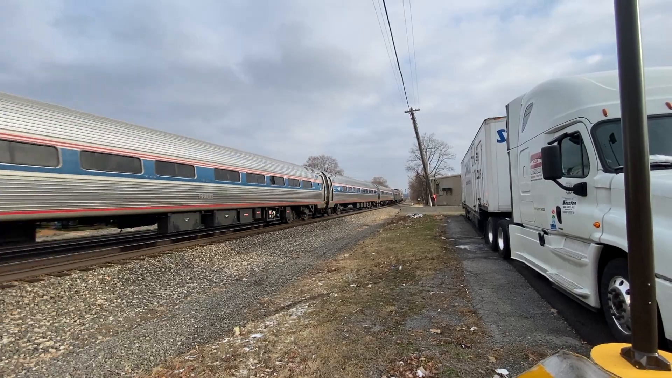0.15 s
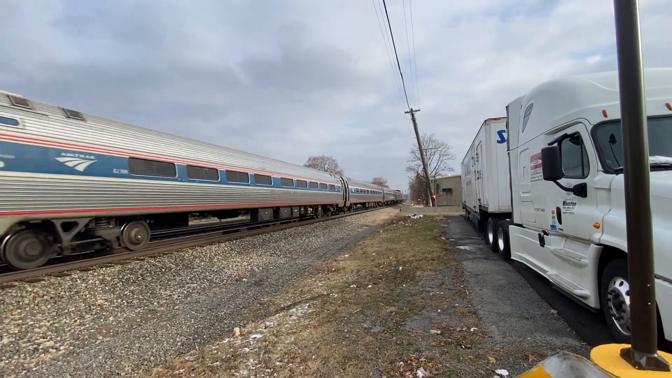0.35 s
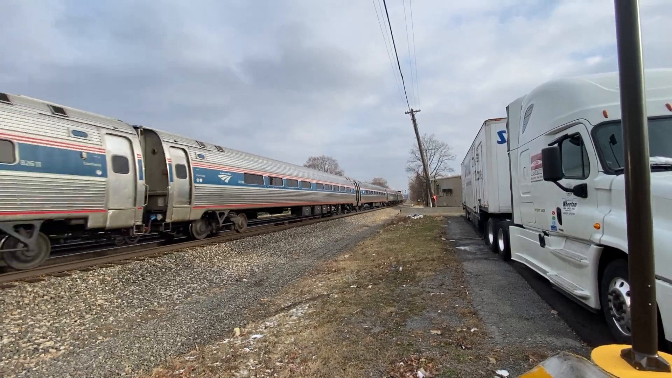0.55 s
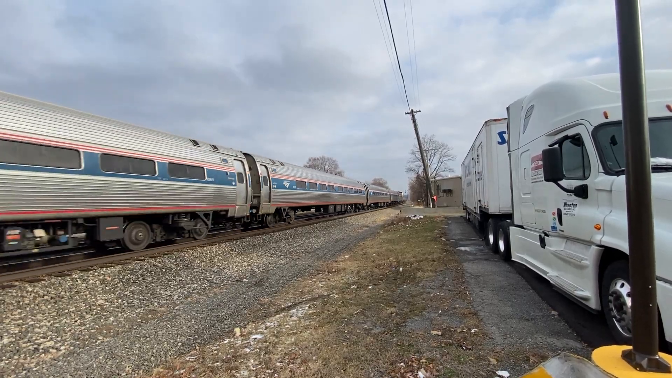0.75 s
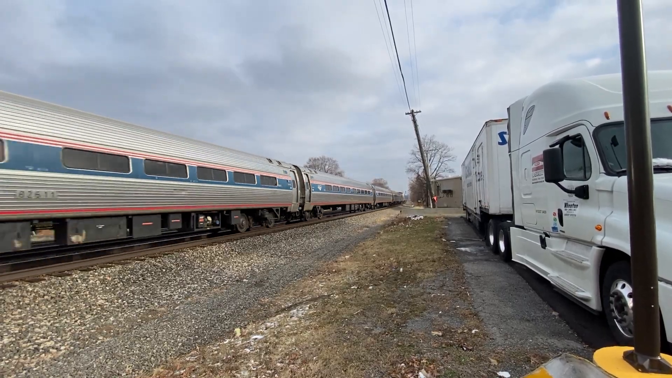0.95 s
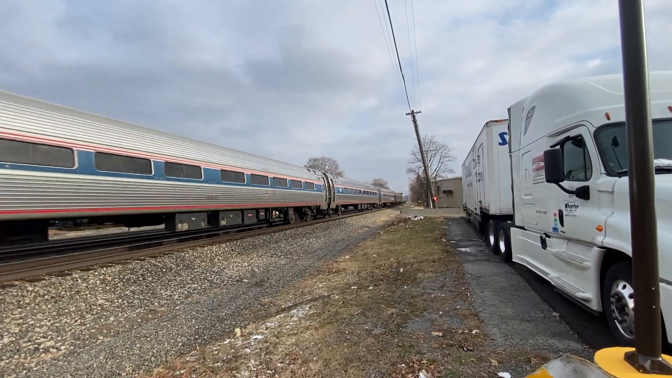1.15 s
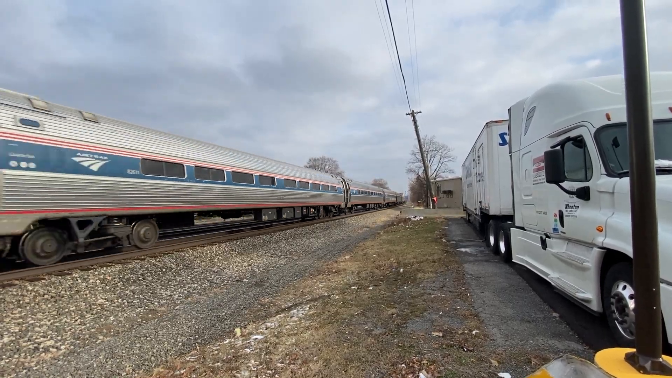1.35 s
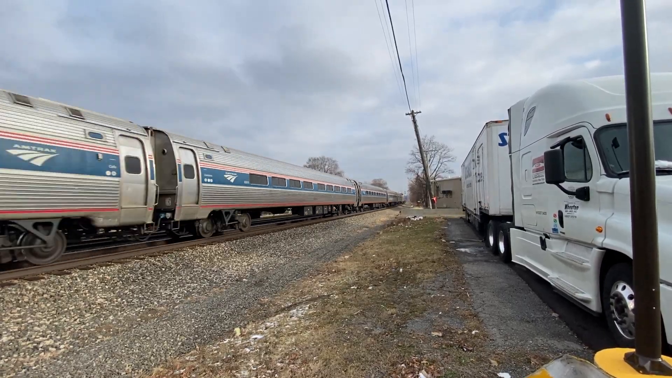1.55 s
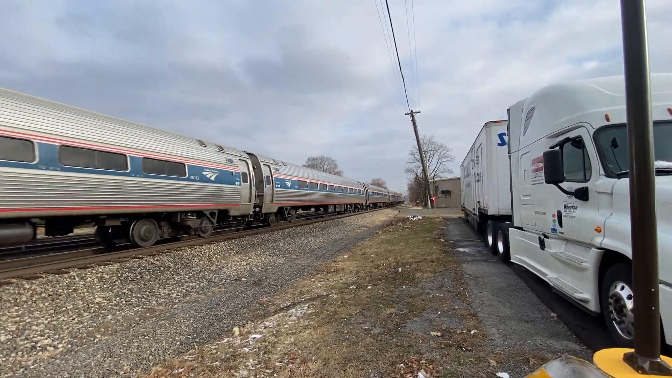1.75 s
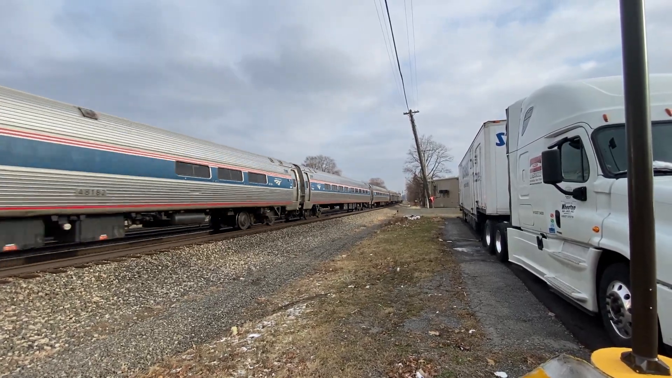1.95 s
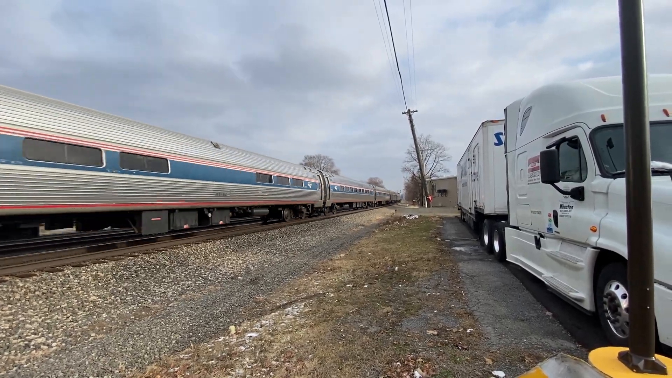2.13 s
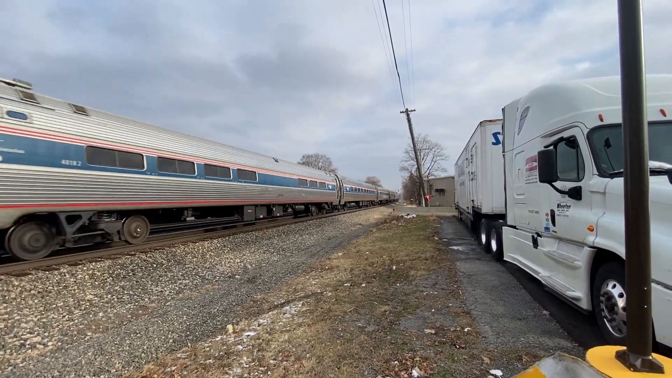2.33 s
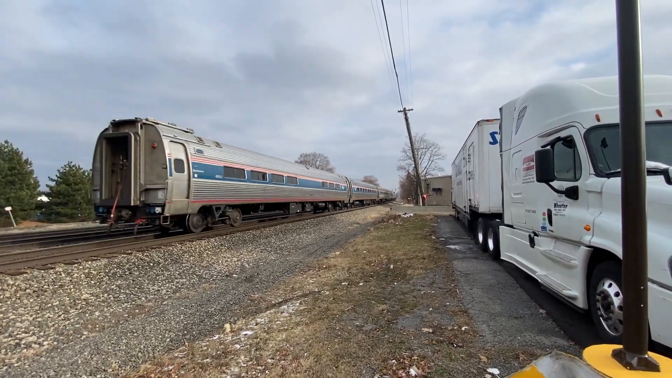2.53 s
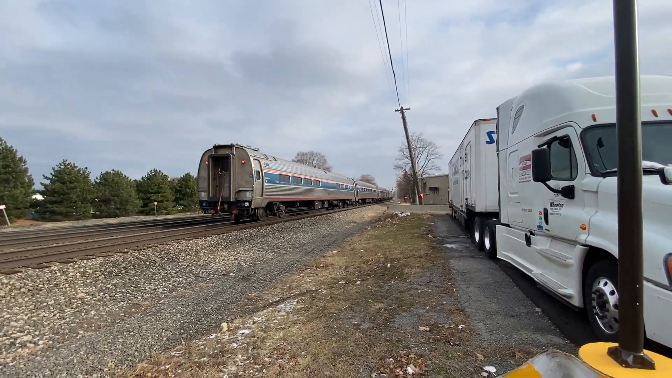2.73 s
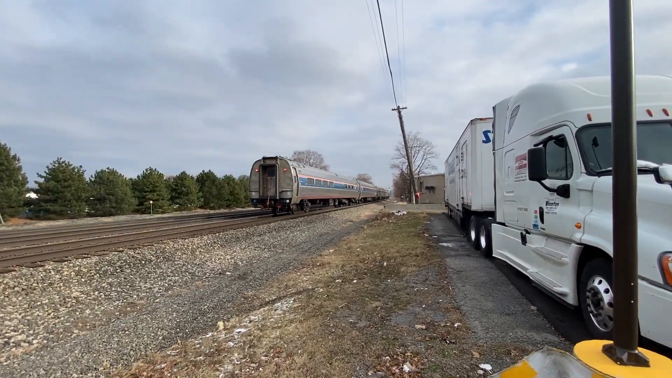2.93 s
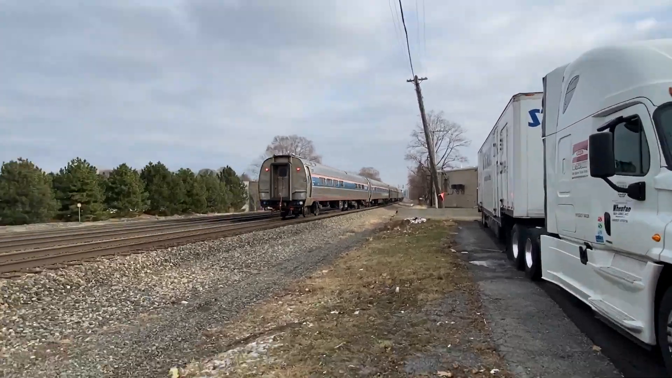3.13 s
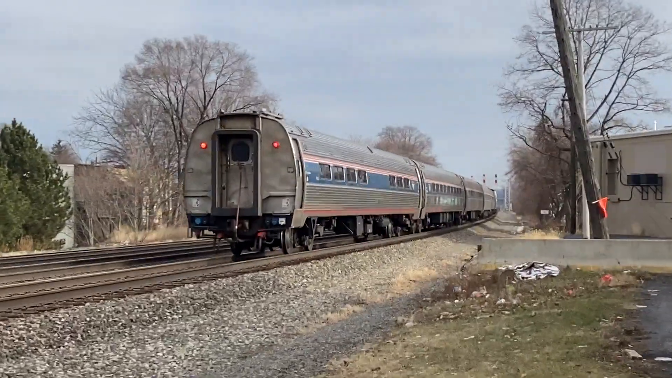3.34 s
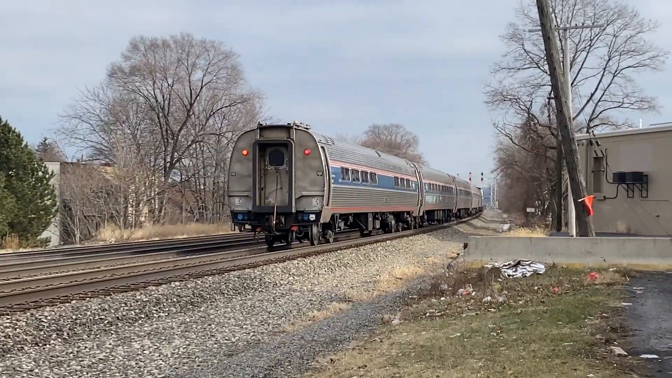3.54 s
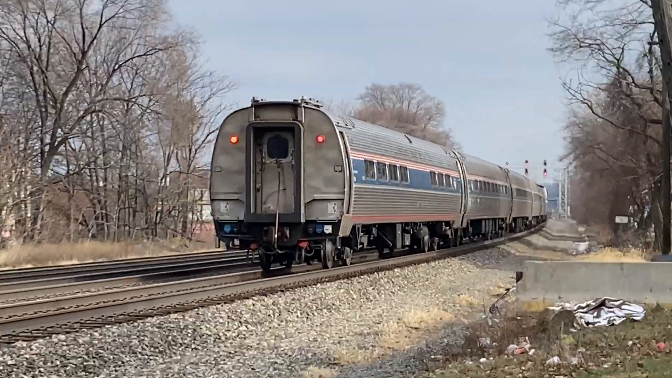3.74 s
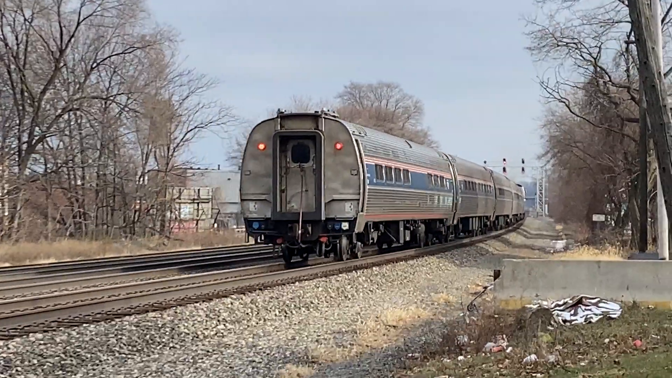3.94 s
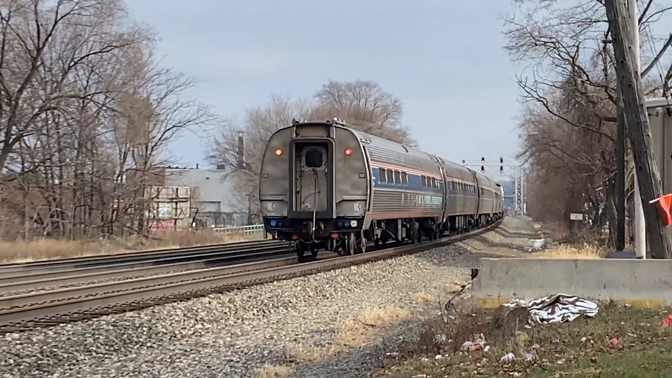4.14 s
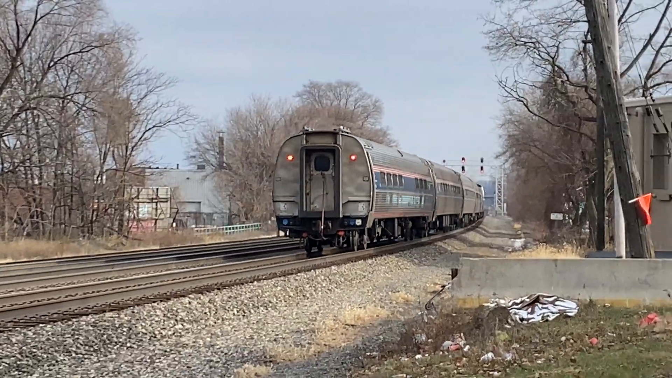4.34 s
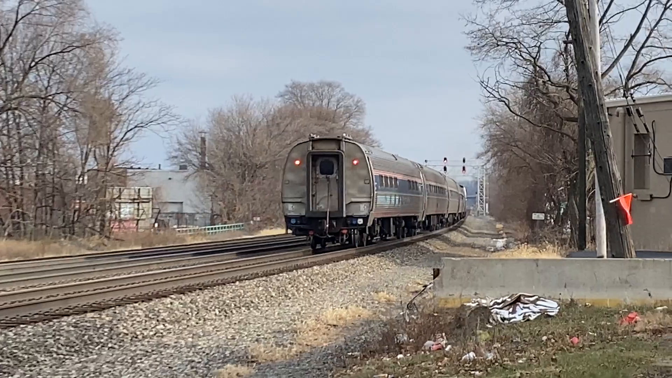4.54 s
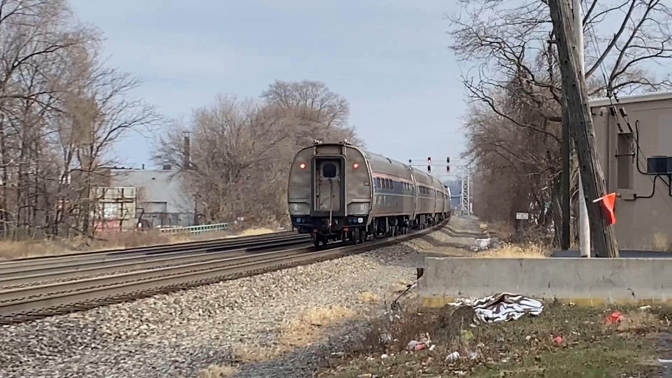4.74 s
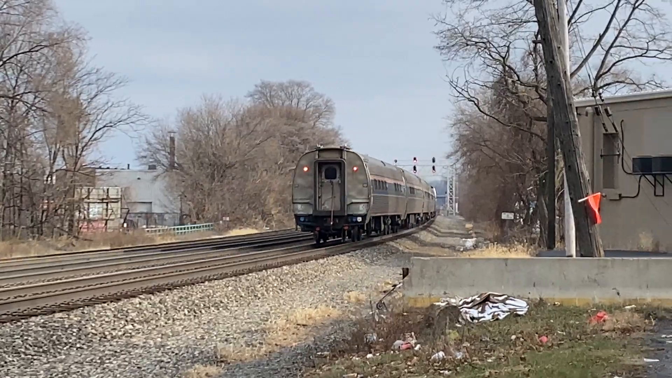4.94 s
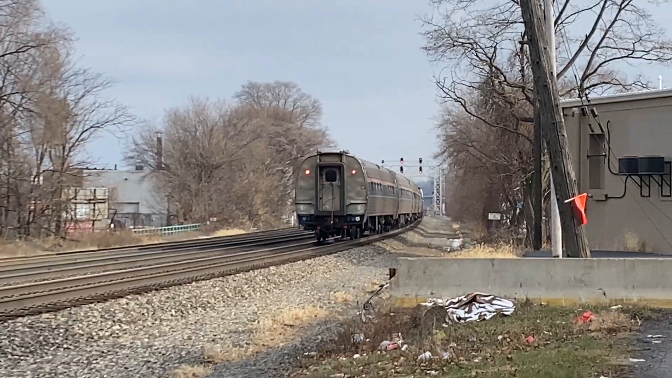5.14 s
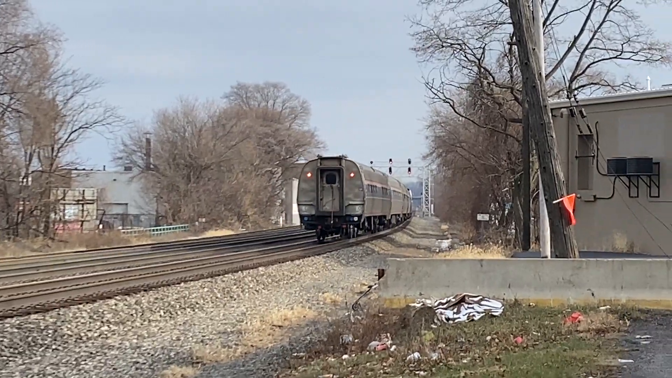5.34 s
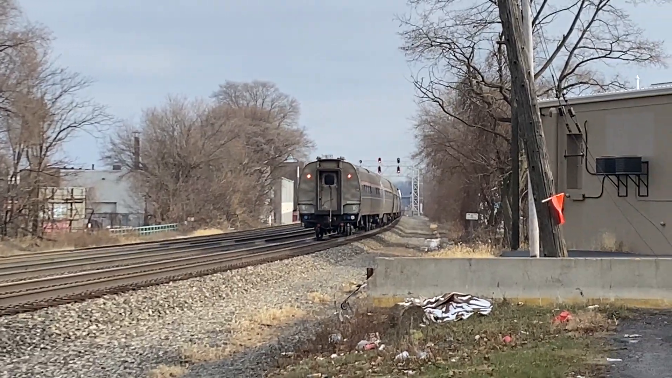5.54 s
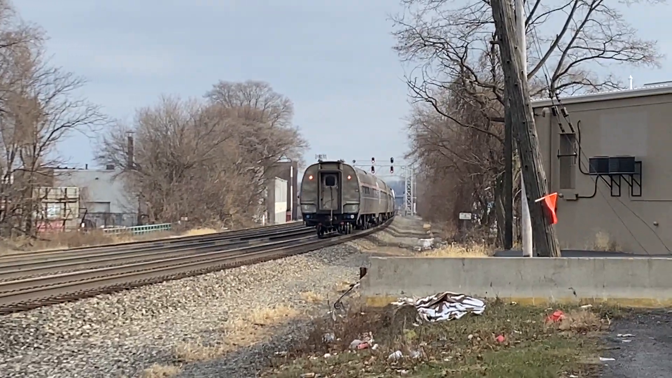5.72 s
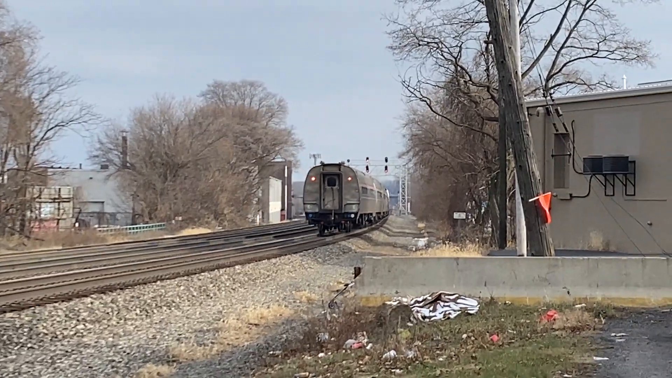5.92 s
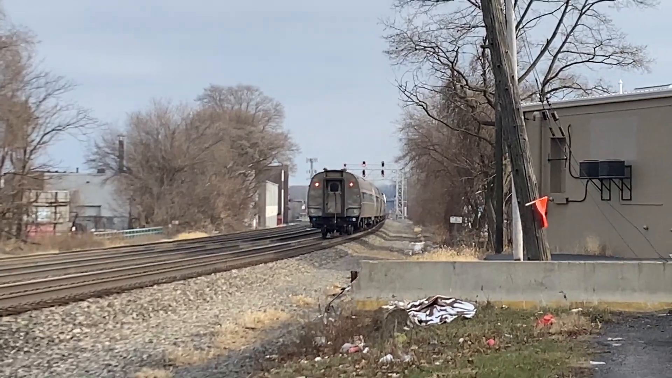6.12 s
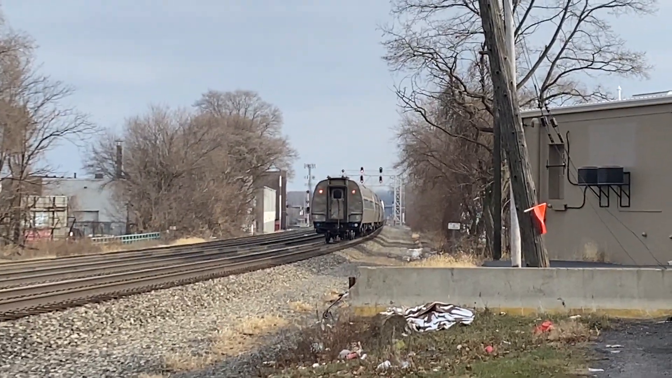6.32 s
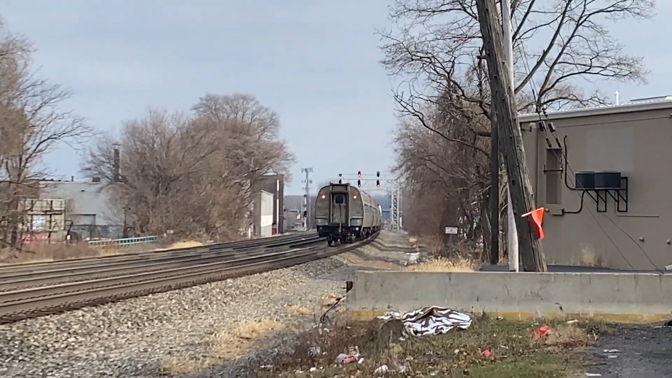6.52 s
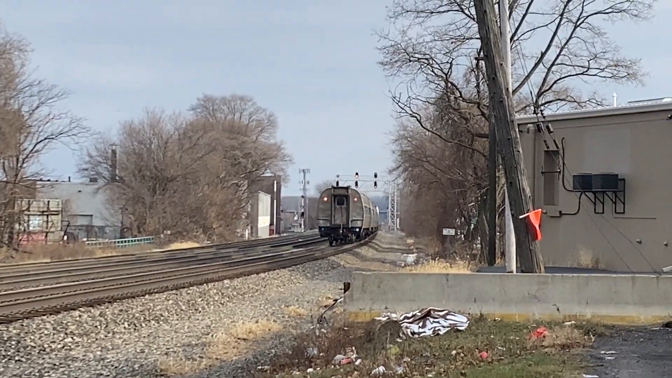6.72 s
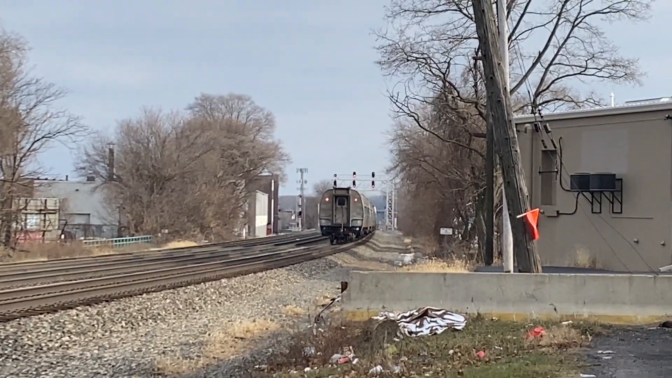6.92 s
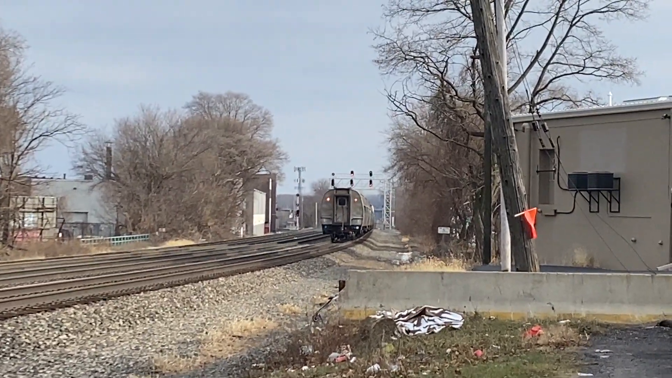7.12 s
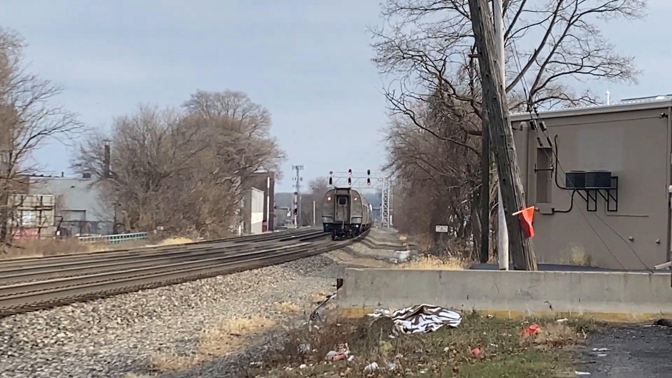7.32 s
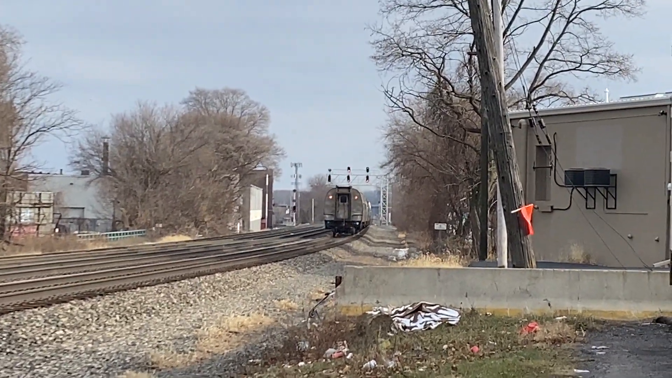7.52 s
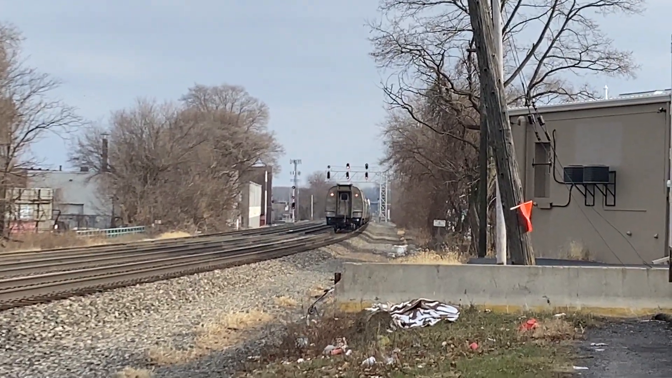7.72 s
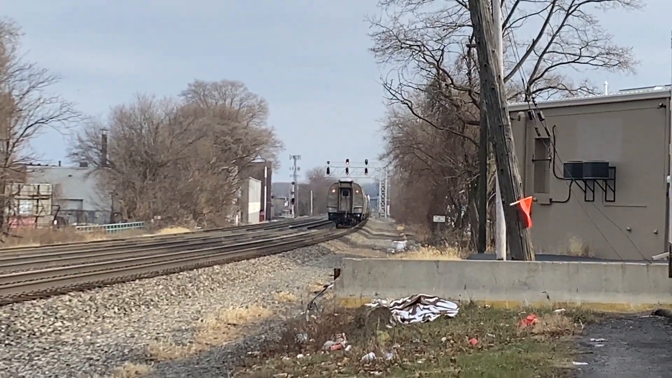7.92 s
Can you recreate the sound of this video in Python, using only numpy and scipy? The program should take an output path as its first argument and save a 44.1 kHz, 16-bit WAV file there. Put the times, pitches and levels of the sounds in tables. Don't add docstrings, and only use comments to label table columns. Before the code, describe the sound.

The last coaches of a passenger train clatter past close by with ringing, squealing wheels, then fade down the track beside an idling truck.

```python
import sys
import numpy as np
from scipy import signal
from scipy.fft import rfft, irfft
from scipy.io import wavfile
from scipy.ndimage import uniform_filter1d

SR = 44100
rng = np.random.default_rng(int(sys.argv[2]) if len(sys.argv) > 2 else 0)


def store_pcm(level_fs):
    pcm = np.round(np.clip(level_fs, -1, 1) * 32767).astype(np.int16)
    wavfile.write(sys.argv[1], SR, np.atleast_2d(pcm).T)


def volts_from_db(level):
    exponent = np.asarray(level, float) / 20
    return 10 ** exponent


N = 351477

SPEED_M_S, SIDE_M, TAIL_S = 25.7, 14.1, 2.07
ZOOM_S = 3.235
# middle in seconds, length in seconds, extra hiss in
# dB, extra air noise in dB.
NOISE_SWELLS = [(0.052, 0.75, 1.5, 3), (0.747, 0.69, -2, 0.5), (1.11, 0.38, 0.4, -0.5), (1.387, 0.6, 3, 4),
                (1.718, 0.057, -0.5, 4), (2.205, 0.16, 0.5, 3), (2.686, 0.28, -0.5, 4.5), (3.405, 1.3, 2, 1),
                (4.2, 0.74, -1.8, 1), (4.5, 2.8, 3, 11.5), (4.018, 0.3, 0, -3), (4.63, 0.22, 0, -4),
                (5.944, .3, 1, 4)]


def at_frequencies(points, hz):
    f, *columns = np.transpose(points)
    return [np.interp(np.log(hz + 1), np.log(f + 1), c) for c in columns]


def at_times(rows, t):
    s, *columns = np.transpose(rows)
    return [np.interp(t, s, c) for c in columns]


def evened(x):
    return x / np.sqrt(np.mean(x ** 2) + 1e-20)


def resonate(x, hz, width):
    turn = np.exp(2j * np.pi * np.cumsum(hz * np.ones(len(x))) / SR)
    r = np.exp(-np.pi * width / SR)
    return 2 * (turn * signal.lfilter([1 - r], [1, -r], x / turn)).real


def add(mix, s, sound):
    part = mix[round(s * SR):][:len(sound)]
    part += sound[:len(part)]


def bump(t, s, length):
    return np.exp(-4 * ((t - s) / length) ** 2)


def swells(rows, t):
    return sum(db * bump(t, s, length) for s, length, db in rows)


def bursts(rows, t):
    return 20 * np.log10(sum(volts_from_db(db) * bump(t, s, length) for s, length, db in rows) + 1e-6)


def sing(t, hz, level_db, width, fuzz):
    fuzzy = evened(resonate(resonate(rng.standard_normal(len(t)), hz, width), hz, width))
    steady = np.sqrt(2) * np.sin(2 * np.pi * np.cumsum(hz) / SR)
    share = np.clip(fuzz, 0, 1)
    tone = share * fuzzy + (1 - share) * steady
    return t[0], volts_from_db(level_db) * tone * signal.windows.tukey(len(t), .08)


def receding(t, near_db, spreading_share, town_db, fade_db_per_s):
    behind_m = SPEED_M_S * np.maximum(t - TAIL_S, 0)
    loss_db = 10 * np.log10(1 + (behind_m / SIDE_M) ** 2)
    engine_fade_db = fade_db_per_s * np.minimum(t, TAIL_S)
    zoom_gain_db = 0.5 * (t > ZOOM_S)
    train_db = near_db - spreading_share * loss_db - engine_fade_db + zoom_gain_db
    return 10 * np.log10(volts_from_db(train_db) ** 2 + volts_from_db(town_db) ** 2)


def hiss_level(t):
    base_db = receding(t, near_db=-33.5, spreading_share=1.58, town_db=-53.5, fade_db_per_s=0.72)
    return base_db + swells([(s, length, db) for s, length, db, _ in NOISE_SWELLS], t)


def truck():
    firing_hz, strong_firing_s = 24.25, 5.915
    # late firing as a share of the gap, level in dB.
    cylinders = [
        (0.029, 2.5),
        (0.05, -9),
        (-0.06, 0.5),
    ]
    # frequency in Hz, width in Hz, level in dB.
    exhaust = [(51.6, 3.9, 2), (76.9, 9.5, 9.5), (91, 38, -10.5), (122.6, 13.2, -1)]
    # multiple of the firing rate, level in dB.
    orders = [(2, -10), (3, -2), (10 / 3, -11), (11 / 3, -7), (4, -3), (5, -2), (16 / 3, -12)]
    # middle in seconds, length in seconds, extra level in dB.
    surges = [(0.158, 0.21, 4.5), (0.998, 0.98, 3.5), (1.545, 0.057, 8.5), (3.3, 0.2, 2.5), (5.9, 1, 0),
              (7.196, 0.14, 2.5)]
    # middle in seconds, length in seconds, level in dB.
    boom = [
        (2.1, .6, -50),
        (3.8, 0.52, -46),
        (6.0, 0.84, -33),
    ]
    # middle in seconds, length in seconds, level in dB.
    drum = [
        (4.4, 2.2, -46),
        (6.0, 1.5, -40.5),
        (7.5, 1.4, -41),
    ]

    firing = np.arange(-round(strong_firing_s * firing_hz), round(N / SR * firing_hz))
    late, db = np.transpose(cylinders)[:, firing % len(cylinders)]
    chance = rng.standard_normal((len(firing), 2))
    fire_s = strong_firing_s + (firing + late + 0.024 * chance[:, 0]) / firing_hz
    pushes = np.zeros(3 * N)
    pushes[(fire_s * SR).astype(int)] = volts_from_db(db + 0.6 * chance[:, 1])
    pushes = pushes[:N]
    pipe = sum(volts_from_db(db) * resonate(resonate(pushes, hz, width), hz, width * 0.88)
               for hz, width, db in exhaust)

    t = np.arange(N) / SR
    turns = (t - strong_firing_s) * firing_hz
    drone = sum(volts_from_db(db) * np.sin(2 * np.pi * k * turns) for k, db in orders)
    idle_db = -29 - 0.5 * t + swells(surges, t)
    panels = sum(volts_from_db(bursts(rows, t)) * np.sqrt(2) * np.sin(2 * np.pi * k * turns)
                 for rows, k in [(boom, 3), (drum, 2)])
    return panels + volts_from_db(idle_db - 2.0) * (0.91 * evened(pipe) + 0.84 * drone)


def grit():
    # start in seconds, peak level in dB.
    ticks = [(1.7683, -37.5), (2.0654, -42), (3.2594, -47), (3.5694, -52), (3.6996, -44), (3.7729, -37),
             (3.85, -45), (4.1844, -36.5), (4.4494, -46), (4.7494, -52), (4.8494, -48), (5.04, -44),
             (5.31, -51), (5.67, -52), (5.77, -44), (6.6872, -50), (4.392, -55), (4.969, -51), (5.52, -54),
             (5.906, -52), (6.236, -55), (7.848, -62)]
    out, t = np.zeros(N), np.arange(2600) / SR
    for s, db in ticks:
        noise = rng.standard_normal(len(t)) * np.sin(np.pi * t / t[-1])
        puff = resonate(resonate(noise, 12500, 4000), 12500, 4000)
        add(out, s, volts_from_db(db - 6.5) * puff / abs(puff).max())
    return out


def flange():
    # start in seconds, length in seconds, level in dB, first pitch in Hz, last pitch in Hz.
    strokes = [
        (1.15, 0.92, -36, 4800, 3070),
        (1.719, 0.23, -42.5, 4000, 3870),
        (1.748, 1, -42.5, 3300, 3500),
        (2.49, 0.16, -53, 3950, 3870),
        (2.717, 0.3, -47.5, 3920, 3730),
        (3.097, 0.65, -45.5, 3550, 3320),
        (3.6, 0.67, -53, 3900, 3400),
    ]
    scrape = np.zeros(N)
    for s, length, db, from_hz, to_hz in strokes:
        t = np.arange(s, s + length, 1 / SR)
        glide = np.exp(-(t - s) / (0.29 * length))
        level_db = bursts([(s + length / 2, length, db)], t)
        add(scrape, *sing(t, to_hz + (from_hz - to_hz) * glide, level_db, width=850, fuzz=1))
    part = scrape[:5 * SR]
    modes_hz = np.linspace(3050, 4600, 13) + 40 * rng.standard_normal(13)
    add(scrape, 0, 0.42 * sum(resonate(part, hz, 24) for hz in modes_hz))
    return scrape


def wheel_modes():
    # frequency in Hz, width in Hz, level in dB over the hiss.
    modes = [(1390, 50, -12), (1980, 45, -13), (2640, 90, -15), (3430, 50, -16), (3980, 26, -22)]
    out, hiss_db = np.zeros(N), hiss_level(np.arange(N) / SR)
    for hz, width, db in modes:
        flicker = np.interp(np.linspace(0, 99, N), np.arange(100), rng.standard_normal(100))
        out += volts_from_db(hiss_db + db + 2.0 * flicker) * evened(resonate(rng.standard_normal(N), hz, width))
    return out


def single_rings():
    # middle in seconds, length in seconds, frequency in Hz, level in dB.
    rings = [(.12, .1, 2084, -32), (.19, .09, 2700, -44), (.22, .09, 2010, -39), (.28, .09, 1495, -29),
             (.31, 0.11, 2720, -34), (.33, .1, 1970, -33.5), (.45, 0.1, 1420, -26), (.51, .13, 2670, -43),
             (.54, .12, 4940, -45), (.55, .08, 3600, -45), (.62, .06, 990, -22.5), (.63, .15, 1870, -33),
             (.79, .1, 1016, -31), (.8, .11, 2030, -41), (.93, .17, 3800, -54), (.93, .19, 1280, -32),
             (1.087, .11, 1990, -38), (1.06, .08, 990, -44), (1.17, .09, 1425, -41), (1.24, .11, 2780, -37),
             (1.24, .11, 1953, -32.5), (1.28, .08, 4530, -42), (1.34, .08, 3560, -34),
             (1.37, .08, 4630, -43), (1.41, .09, 1415, -31), (1.46, .2, 1430, -36), (1.48, .17, 2700, -46),
             (1.45, .08, 4340, -48), (1.51, .09, 4040, -37), (1.56, .11, 1930, -41), (1.56, .14, 3390, -41),
             (1.68, .09, 3400, -34), (1.74, .09, 4930, -45), (1.81, .08, 3820, -42), (1.8, .08, 4030, -48),
             (1.97, .13, 1330, -29), (2.01, .08, 3360, -31), (2.15, .2, 3420, -50),
             (2.22, 0.11, 1565, -34.5), (2.33, .12, 1534, -39), (2.576, .11, 4000, -55),
             (2.8, .12, 3870, -51), (2.82, .12, 3210, -39), (2.8, .12, 3350, -50), (2.86, .12, 4110, -50),
             (.5, .08, 987, -29), (3.143, .08, 3950, -50),
             (.09, 0.087, 6500, -43), (.23, 0.059, 2150, -32.5), (.24, 0.069, 2450, -39),
               (.3, .1, 3700, -48), (.4, 0.095, 4550, -54), (.45, .2, 3550, -53), (.72, 0.049, 960, -36),
               (.77, .05, 6150, -40), (.8, 0.066, 1000, -25.5), (.88, 0.05, 1010, -32),
               (.97, 0.11, 990, -28.5), (.93, .15, 3800, -46), (1.02, 0.16, 2010, -39),
               (1.27, 0.11, 4220, -39), (1.29, .1, 4470, -43), (1.38, .07, 4640, -41),
               (1.4, .07, 3740, -45), (1.45, 0.075, 4330, -45), (1.5, 0.14, 4050, -47),
               (1.52, .1, 3500, -36), (1.68, .05, 3320, -33), (1.8, .1, 4050, -36),
               (1.82, 0.052, 3850, -44), (1.85, 0.13, 4170, -48), (1.93, .06, 3480, -36),
               (1.95, 0.088, 4000, -41), (2.14, 0.11, 3440, -41), (2.38, .14, 3500, -54),
               (2.5, 0.19, 178, -40), (2.52, 0.11, 5020, -48), (2.53, 0.057, 3520, -37),
               (2.55, .08, 3800, -49), (2.575, .09, 3960, -39), (2.79, 0.074, 3830, -38),
               (2.8, 0.16, 3420, -38), (2.81, .1, 3950, -43), (2.58, .1, 3850, -43),
               (3.35, 0.083, 2620, -48), (3.4, 0.2, 3990, -45), (4.3, .25, 11500, -61),
               (4.78, .05, 11300, -60), (5.35, 0.11, 11000, -65)]
    out = np.zeros(N)
    for s, length, hz, db in rings:
        t = np.arange(max(s - length, 0), s + length, 1 / SR)
        level_db = bursts([(s, length, db - 2)], t)
        add(out, *sing(t, hz + 0 * t, level_db, width=min(100, hz / 12), fuzz=.62))
    return out


def singing_modes():
    # middle in seconds, length in seconds, level in dB.
    drag = [
        (1.7, 0.55, -43.5),
    ]
    rail_hum = [(2.15, .1, -38), (2.43, .32, -33.5), (2.7, .1, -36.5), (2.98, .28, -39), (3.17, .2, -45),
                (3.42, .25, -46), (3.7, .22, -43), (3.92, .28, -44.5), (4.15, .22, -42), (4.38, .28, -41),
                (4.6, .2, -49), (5.4, .45, -48)]
    wheel_song = [(2.12, .25, -44), (3.285, .075, -44), (3.365, .05, -40), (3.398, .04, -35),
                  (3.46, .05, -39.5), (3.55, .08, -45), (3.635, .11, -37), (3.74, .065, -42),
                  (3.81, .05, -50), (3.87, .09, -47), (3.94, .06, -51), (4.01, .05, -48), (4.07, .08, -43),
                  (4.15, .09, -48), (4.31, .08, -51), (4.45, .08, -50.5)]
    wheel_top = [
        (3.15, .18, -52),
        (3.275, .07, -50),
        (3.62, .35, -62),
        (4.15, .2, -65),
        (2.52, .08, -53),
    ]
    wheel_low = [
        (2.45, 0.31, -45),
        (3.3, 0.17, -49),
        (3.45, 0.29, -49.5),
    ]
    out = np.zeros(N)
    # table, pitch in Hz, rise in Hz per s, width in Hz, noise share
    for rows, hz, rise, width, fuzz in [(drag, 11740, 0, 120, .9), (rail_hum, 232, 2.81, 8, .1),
                                        (wheel_song, 3202, 7.5, 80, .24), (wheel_top, 4925, 0, 25, .15),
                                        (wheel_low, 2600, 0, 60, .8)]:
        start = min(s - length for s, length, _ in rows)
        end = max(s + length for s, length, _ in rows)
        t = np.arange(start, min(end, N / SR), 1 / SR)
        pitch = hz + rise * abs(t - 3.25)
        add(out, *sing(t, pitch, bursts(rows, t), width, fuzz))
    return out


def brake_whistles():
    # passing time in seconds, pitch in Hz, brief peak level at passing in dB, level on approach in
    # dB.
    whistles = [
        (1.059, 11730, -28.5, -42),
        (2.1, 11800, -28.5, -35),
    ]
    out = np.zeros(N)
    for s, hz, abreast_db, lead_db in whistles:
        t = np.arange(s - .52, s + .4, 1 / SR)
        ahead_m = SPEED_M_S * (t - s)
        pitch = hz * (1 - SPEED_M_S / 343 * ahead_m / np.hypot(ahead_m, SIDE_M))
        abreast = volts_from_db(abreast_db) ** 2 / (1 + ((t - s) / 0.045) ** 2) ** 1.23
        approach = (volts_from_db(lead_db) * bump(t, s - 0.27, 0.41)) ** 2
        add(out, *sing(t, pitch, 10 * np.log10(abreast + approach), width=210, fuzz=0.48))
    return out


def clatter():
    # start in seconds, peak level in dB, ring in Hz.
    flat_wheel = [(0.063, -22, 620), (0.082, -12, 610), (0.115, -14, 426), (0.178, -19, 674),
                  (0.2, -13, 522), (0.217, -8.5, 570), (0.232, -15, 685), (0.314, -6.5, 647),
                  (0.412, -7, 440), (0.438, -8.5, 430), (0.518, -11, 444), (0.573, -11, 590),
                  (0.625, -9.5, 600), (0.688, -13, 510), (0.734, -14, 710), (0.785, -22, 570),
                  (0.841, -10, 614), (0.866, -16, 470), (0.916, -13.5, 452), (0.955, -16.5, 580),
                  (0.99, -27, 646), (1.013, -14, 570), (1.062, -10.5, 607), (1.102, -17, 650),
                  (1.155, -12.5, 604), (1.196, -15.5, 570), (1.235, -24, 535), (1.26, -10, 513),
                  (1.32, -16.5, 520), (1.361, -16, 493), (1.4, -11.5, 460), (1.415, -16, 604),
                  (1.453, -16, 534), (1.513, -9.5, 436), (1.572, -9.5, 560), (1.615, -13.5, 774),
                  (1.674, -12, 550), (1.72, -15, 850), (1.737, -9, 600), (1.83, -14, 684),
                  (1.858, -12.5, 490), (1.897, -7.5, 520), (1.935, -11, 670), (1.99, -17, 600),
                  (2.045, -15, 720), (2.067, -14.5, 640), (2.106, -24, 436), (2.154, -17, 690),
                  (2.174, -15, 582), (2.237, -40, 673), (2.267, -29, 615), (2.371, -26, 560)]
    # start in seconds, peak level in dB, ring in Hz.
    joints = [
        (6.657, -31, 640),
        (6.85, -35, 800),
        (7.01, -35, 720),
        (7.222, -29, 750),
        (7.29, -34, 760),
        (7.38, -35, 740),
    ]
    # frequency in Hz, width in Hz, level in dB.
    tread = [(960, 150, -13), (1316, 160, -15), (2004, 180, -23)]
    echo_s, echo_db = .024, -13
    high_pass = signal.butter(2, 300, "high", fs=SR, output="sos")
    out, t = np.zeros(N), np.arange(2600) / SR
    for s, db, hz in flat_wheel + joints:
        noise = rng.standard_normal(len(t))
        knock = np.exp(-t / 0.00037) + 0.23 * noise * volts_from_db(-60 * t / 0.07)
        knock = knock * np.minimum(t / 0.0008, 1)
        blow = resonate(resonate(knock, hz, 210), hz * 1.1, 460)
        blow += sum(volts_from_db(ring_db) * resonate(resonate(knock, f, width), f, 400) for f, width, ring_db in tread)
        blow = signal.sosfilt(high_pass, blow)
        blow = volts_from_db(db - 1.1) * blow / abs(blow).max()
        add(out, s, blow)
        add(out, s + echo_s, volts_from_db(echo_db) * blow)
    return out


def rolling():
    # frequency in Hz, density in dB per Hz.
    roar_near = [(22, -72), (35, -25), (60, -8), (110, -8.5), (200, -4.5), (250, -4), (310, -16), (400, -5),
                 (600, -3.5), (850, -7), (1000, -9), (1150, -25.5), (1500, -35.5), (2500, -62)]
    roar_far = [(22, -41), (38, -21), (50, -14), (100, -5.5), (160, -8), (235, -17), (300, -13.5),
                (400, -21), (750, -17.5), (1150, -18), (1500, -6), (2500, -80)]
    hiss_near = [(900, -0.5), (1150, 0.5), (1400, 2), (1700, -6), (2000, -6.5), (2400, -6.5), (3500, -9),
                 (5000, -8.5), (8000, -11), (10000, -60)]
    hiss_far = [(900, -30.5), (1150, -6.5), (1400, -3), (1700, 0.5), (2000, -0.5), (2400, -8), (3400, -3.5),
                (4600, -18.5), (7000, -32), (9000, -48)]
    air_near = [(7000, -13), (9000, -4), (11000, -3), (12000, -2.5), (13000, -7.5), (14000, -8),
                (15000, -8.5), (15750, -23), (15950, -59)]
    air_far = [(7000, -31), (9000, -29), (11000, -12.5), (12000, -13.5), (13000, 3), (14000, 7.5),
               (15000, 4), (15750, -10), (15950, -58)]
    # time in seconds, share from 0 near to 1 far.
    distance = [(0, 0.19), (1, 0.17), (2.2, 0.12), (2.8, 0.24), (3.3, 0.108), (4.2, 0.39), (5, 0.66),
                (6, 0.73), (7.97, 1)]
    # middle in seconds, length in seconds, extra
    # level in dB.
    top_swells = [
        (1.02, .35, 8),
        (1.5, .3, -3),
        (1.85, .5, -6),
        (2.5, .7, -5),
        (3.45, .9, 7),
        (4.35, .6, 4),
    ]

    frames, hz = N // 256 + 5, np.fft.rfftfreq(1024, 1 / SR)
    t = np.arange(frames) * 256 / SR
    far = np.clip(at_times(distance, t)[0], 0, 1)
    roar_db = receding(t, near_db=-27, spreading_share=1.37, town_db=-42.5, fade_db_per_s=1.47)
    air_db = receding(t, near_db=-54, spreading_share=2.5, town_db=-78, fade_db_per_s=-1.2)
    air_db = air_db + swells([(s, length, db) for s, length, _, db in NOISE_SWELLS], t)

    gusts = evened(uniform_filter1d(rng.standard_normal(frames), size=8))
    a, b, patches = rng.standard_normal((frames, 513, 3)).T
    patches = uniform_filter1d(uniform_filter1d(patches, size=10, axis=0), size=12, axis=1)
    patches = evened(patches)
    layers = [(roar_near, roar_far, roar_db + 1.83, .3),
              (hiss_near, hiss_far, hiss_level(t) + 3.0, .3),
              (air_near, air_far, air_db + 5.5 + 6 * far, 0.83 + 1.1 * far)]
    power = np.zeros((513, frames))
    for near, distant, level_db, gust_db in layers:
        near_db = at_frequencies(near, hz)[0][:, None]
        distant_db = at_frequencies(distant, hz)[0][:, None]
        shape = volts_from_db(near_db * (1.5 - far) + distant_db * far) ** 2
        power += shape / shape.sum(0) * volts_from_db(level_db + gust_db * gusts) ** 2
    power *= volts_from_db((hz[:, None] > 13400) * swells(top_swells, t)) ** 2
    z = (a + 1j * b) * np.sqrt(power) * volts_from_db(1.06 * patches + 2.5)
    return signal.istft(z, nperseg=1024, noverlap=768)[1][:N]


def ports(x):
    # frequency in Hz, likeness from 0 to 1,
    # lag of the right port in turns, left minus right in dB.
    wide = [(60, .98, 0, -3), (150, .9, 0, -3), (215, .8, .08, -4.5), (300, .75, .22, -2),
            (390, .86, .3, 1), (470, .88, .31, 2.5), (800, .8, .34, 3.5), (1000, .8, .35, 1.5),
            (1400, .78, .55, -3), (2200, .55, 1, -1), (3300, .42, 1.6, 6), (4100, .25, 2, 5),
            (6000, .3, 2.5, 4), (7000, .45, 3, 4), (8200, .82, 3.5, 2), (8750, .8, 3, 1),
            (9300, .95, 2.5, 0), (11050, .97, 2, 0), (13100, .97, 1.5, 0), (15300, .97, 1, 0)]
    zoomed = [(60, .995, 0, -1.5), (300, .98, 0, -1.5), (600, .92, .03, -2), (1550, .75, .07, -.5),
              (2100, .95, .02, 0), (3300, .96, .04, 0), (3700, .995, 0, 0), (7200, .995, 0, 0),
              (8200, .7, -.35, 0), (9200, .95, -.5, 0), (11100, .94, -1, 0), (12850, .94, -1.3, 0),
              (13300, .93, -1.5, 0), (13750, .94, -1.7, 0), (15500, .94, -2, 0)]
    # time in seconds, share of the low-band lag left.
    bearing = [(0, 1), (2.2, 1), (2.6, .8), (3, .55), (3.23, .5), (3.24, 1), (7.97, 1)]

    scatter = rng.standard_normal(5000) * volts_from_db(-60 * np.arange(5000) / SR / 0.34)
    scatter = irfft(np.exp(1j * np.angle(rfft(scatter))))
    scattered = signal.oaconvolve(x, scatter / np.linalg.norm(scatter))[:N]
    hz, t, z = signal.stft([x, scattered], SR, nperseg=512)
    before = np.array(at_frequencies(wide, hz))[:, :, None]
    after = np.array(at_frequencies(zoomed, hz))[:, :, None]
    same, lag, left_db = np.where(t < ZOOM_S, before, after)
    lag = lag * np.where(hz[:, None] < 1300, at_times(bearing, t)[0], 1)
    drift = np.exp(1j * np.cumsum(.3 * rng.standard_normal(len(t))))
    right = same * z[0] * np.exp(-2j * np.pi * lag) + np.sqrt(1 - same ** 2) * z[1] * drift
    pair = [z[0] * volts_from_db(left_db / 2), right * volts_from_db(-left_db / 2)]
    return signal.istft(pair, SR, nperseg=512)[1][:, :N]


def scene():
    wheels = brake_whistles() + singing_modes() + single_rings() + wheel_modes()
    return ports(rolling() + wheels + flange() + clatter() + grit() + truck())


def top_cut(x):
    return signal.sosfilt(signal.butter(12, 15850, fs=SR, output="sos"), x)


def record(dry):
    dry = signal.sosfilt(signal.butter(3, 36, "high", fs=SR, output="sos"), dry)
    hz, t, z = signal.stft([dry[0] + dry[1], dry[0] - dry[1]], SR, nperseg=2048)
    band = np.arange(len(hz)) // 12
    starts = np.flatnonzero(np.diff(band, prepend=-1))
    band_db = 10 * np.log10(np.add.reduceat(abs(z) ** 2, starts, axis=1) + 1e-20)[:, band]
    treble_db = band_db[:, hz > 9000].max(axis=(0, 1))
    beside_other = band_db > band_db[::-1] - np.where(hz < 3600, 14.5, 8)[:, None]
    beside_treble = (band_db > treble_db - 23) | (hz[:, None] < 13400)
    keep = beside_other & (band_db > -98) & beside_treble
    keep = keep | (hz[:, None] < 2200)
    total, difference = signal.istft(z * keep, SR, nperseg=2048)[1][:, :N] / 2
    return top_cut(np.array([total + difference, total - difference]))


dry = scene()
out = record(dry)
store_pcm(out)
```